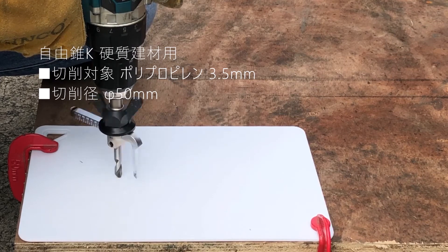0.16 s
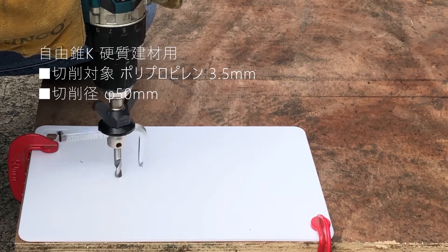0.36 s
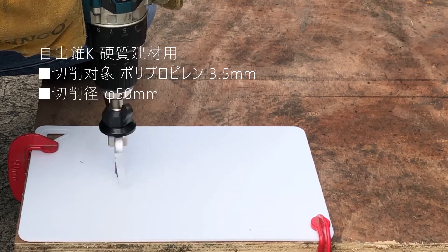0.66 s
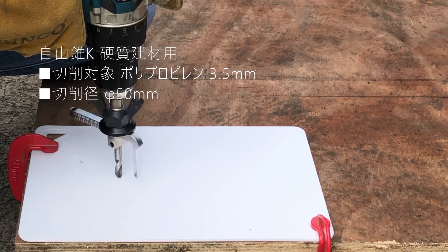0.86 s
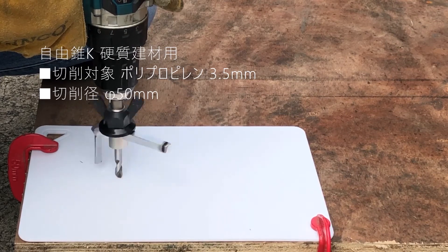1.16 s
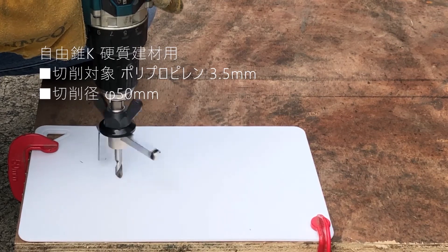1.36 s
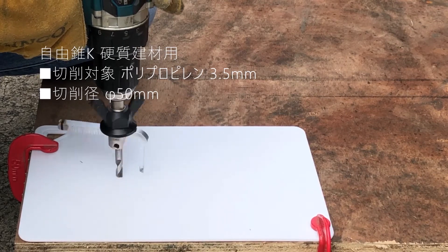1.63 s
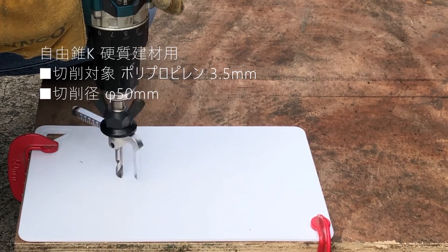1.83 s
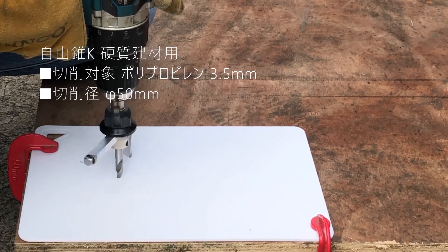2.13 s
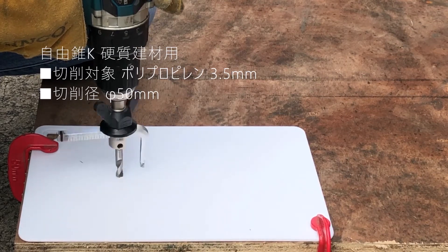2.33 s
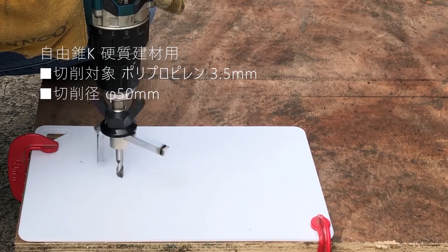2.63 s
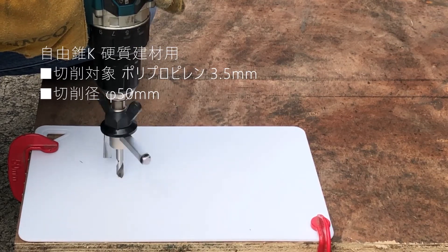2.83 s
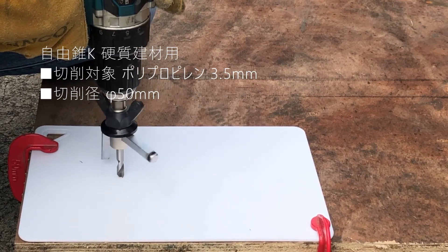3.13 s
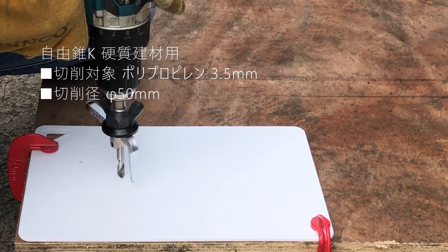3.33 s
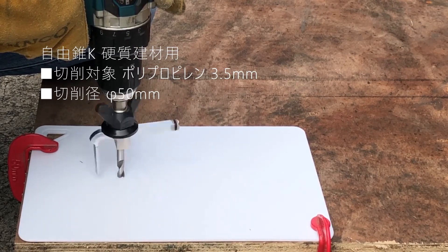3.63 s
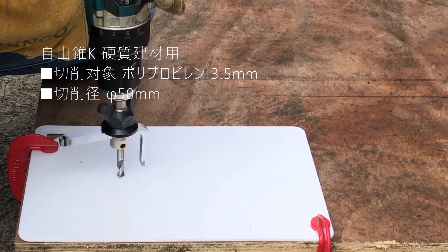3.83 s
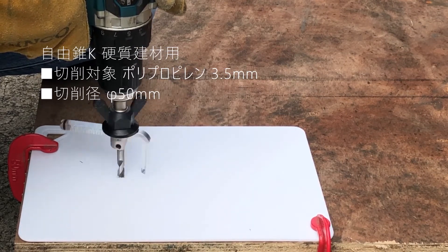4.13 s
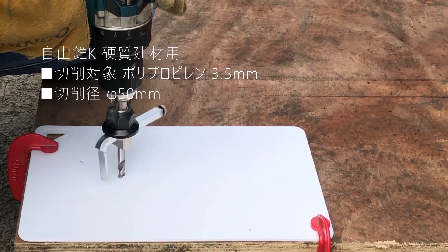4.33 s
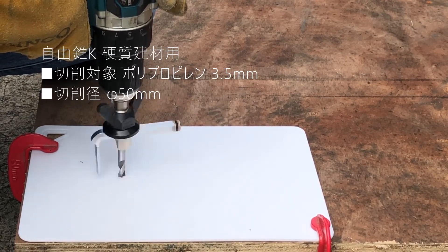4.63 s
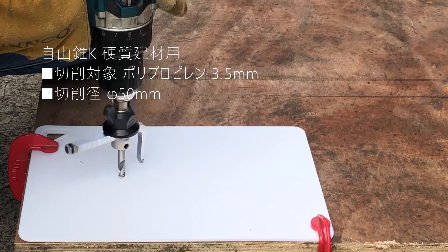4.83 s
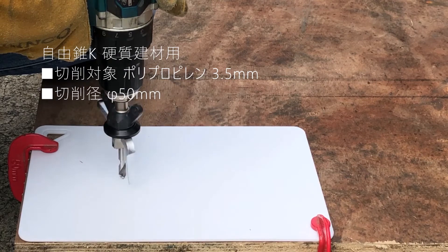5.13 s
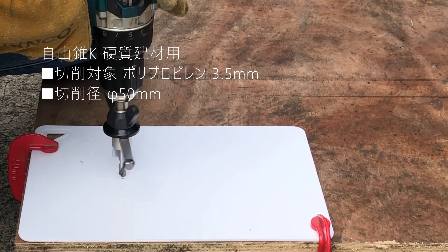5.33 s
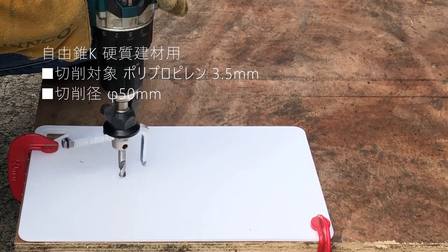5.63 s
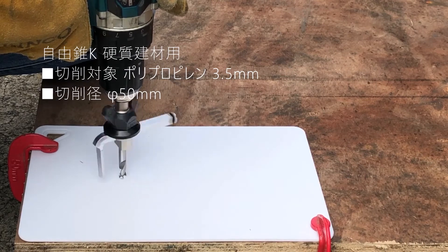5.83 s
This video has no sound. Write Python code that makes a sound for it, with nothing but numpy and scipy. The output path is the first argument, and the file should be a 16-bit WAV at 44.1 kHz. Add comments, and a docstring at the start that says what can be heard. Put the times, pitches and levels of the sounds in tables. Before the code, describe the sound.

A cordless drill is already running at the start, spinning a circle cutter over a plastic sheet. It makes a high whine over a motor hum, with fine gearbox chatter and a hiss of cooling air. Thin, very high tones fade within the first second. At about 1 second the pitch rises and the sound grows, creeping upward until a single sharp tick at about 2.2 seconds, then easing slightly. At 3 seconds the drill jumps quickly to a higher, louder whine with more hiss. It sags and wavers around 4 seconds, climbs back by about 5 seconds and is still running at 6 seconds. Now and then the chatter and hiss dip for an instant. A faint, steady low rumble lies underneath. The sound is mono, from one microphone, with slight short reflections from nearby surfaces.

```python
"""First comes the high whine of a cordless drill, spinning a circle cutter over a clamped plastic sheet.
The trigger is squeezed further in two steps and the motor's speed drives everything: the fan whines at 23
times the shaft rate, the poles hum at 4 times, the gearbox chatters and cooling air hisses, all growing
with speed. Surfaces near the single microphone add short echoes, a low rumble fills the place, and now
and then the level dips briefly."""
import sys
import numpy as np
from scipy.fft import rfft, irfft, next_fast_len
from scipy.io import wavfile
from scipy.ndimage import map_coordinates

SR = 44100
rng = np.random.default_rng(int(sys.argv[2]) if len(sys.argv) > 2 else 0)


def file_out(sig):
    """Save sig as 16-bit WAV at sys.argv[1]."""
    # one column per channel
    cols = np.atleast_2d(sig).T
    # limit, then scale
    lim = np.clip(cols, -1, 1)
    pcm = np.round(lim * 32767).astype(np.int16)
    wavfile.write(sys.argv[1], SR, pcm)


N = 263718
TIME_S = np.arange(N) / SR
CRUISE_HZ = 350  # shaft speed at which growth() adds nothing


def amp(db):
    """Decibels to gain."""
    return 10 ** (np.asarray(db) / 20)


def unit(x):
    """Scale to rms 1."""
    return x / np.sqrt(np.mean(x ** 2) + 1e-20)


def wobble(rate):
    """A smooth random curve, rate knots a second."""
    return map_coordinates(rng.standard_normal(int(N * rate / SR) + 4), [TIME_S * rate])


def filtered(x, response):
    """Pass x through a complex response of frequency."""
    size = next_fast_len(N + SR // 2)
    return irfft(rfft(x, size) * response(np.fft.rfftfreq(size, 1 / SR)), size)[:N]


def noise(spectrum):
    """Noise of rms 1, coloured by (pitch_hz, gain_db) points on a log axis."""
    hz, db = np.transpose(spectrum)
    colour = lambda f: amp(np.interp(np.log(f + 1), np.log(hz), db))
    return unit(filtered(rng.standard_normal(N), colour))


def tone(turns, db):
    """A sine of the given rms level, starting at a random phase."""
    return np.sqrt(2) * amp(db) * np.sin(2 * np.pi * (turns + rng.random()))


def resonate(force, modes):
    """A force rings damped modes (pitch_hz, width_hz, gain_db) of alternating sign."""
    def response(f):
        return sum((-1) ** k * amp(db) * 1j * f * width / (hz * hz - f * f + 1j * f * width)
                   for k, (hz, width, db) in enumerate(modes))
    return filtered(force, response)


def growth(speed, db_per_octave):
    """Level gained over cruising speed, in dB."""
    return db_per_octave * np.log2(speed / CRUISE_HZ)


# The motor shaft as the trigger goes in: time_s, speed_hz
SHAFT_SPEED = [(0.0, 273.4), (0.54, 270.4), (0.6, 263.5), (0.82, 265.5), (1.11, 319.7), (1.35, 332.0),
               (1.61, 332.4), (1.86, 344.8), (2.03, 362.8), (2.29, 370.6), (2.59, 341.7), (2.9, 336.7),
               (2.98, 347.6), (3.02, 392.7), (3.05, 402), (3.11, 474), (3.25, 474), (3.3, 484.6),
               (3.45, 478.6), (3.54, 493.2), (3.71, 492.2), (3.85, 459.5), (4.32, 422), (4.39, 435.5),
               (4.44, 428.8), (4.65, 453), (4.84, 461.5), (4.91, 444.4), (4.98, 476), (5.2, 499.1),
               (5.46, 469.8), (5.78, 466), (5.98, 493)]


def shaft_speed(hunt_s=4.078, hunt_half_s=0.16, hunt_hz=9.1, hunt_depth=0.012):
    """Turns per second, set by trigger and load; the motor hunts up and down as it sags at full trigger."""
    speed = np.interp(TIME_S, *np.transpose(SHAFT_SPEED))
    age = TIME_S - hunt_s
    hunt = hunt_depth * np.cos(2 * np.pi * hunt_hz * age) * np.exp(-(age / hunt_half_s) ** 2)
    jitter = .0007 * wobble(60)
    drift = .0013 * (CRUISE_HZ / speed) ** 3 * wobble(18)  # a slow motor drifts more
    return speed * (1 + hunt + jitter + drift)


# Where reflections cancel the whine at the microphone: pitch_hz, half_width_hz, depth_db
WHINE_NULLS = [(6114, 63, -12), (6750, 200, -9), (7354, 180, -13), (8205, 152, -12.5), (9700, 118, -11.5),
               (10333, 400, -3), (11353, 245, -8.5)]


def fan_whine(speed, turns, blades=23, cruise_db=-31.5, flutter_db=1.2, waver_db=0.3):
    """The blade tone grows with speed and sinks wherever its pitch crosses a null."""
    null_db = sum(db * np.exp(-((blades * speed - hz) / width) ** 2) for hz, width, db in WHINE_NULLS)
    level_db = cruise_db + growth(speed, db_per_octave=16.5) + null_db
    return tone(blades * turns, level_db + flutter_db * wobble(70) + waver_db * wobble(20))


# How loudly the motor's shell gives off a pole tone, before growth with speed: pitch_hz, level_db
MOTOR_SHELL = [(1040, -37.5), (1090, -34), (1160, -35), (1210, -46), (1720, -49.5), (1820, -61),
               (1980, -50.5), (2140, -45), (2180, -56), (2320, -46), (2750, -62), (3190, -52),
               (3270, -40.5), (3400, -64), (3700, -52), (6000, -72)]


def pole_hum(speed, turns, poles=4, flutter_db=1.97):
    """The poles' tone and two overtones swell and fade as they slide over the shell's resonances."""
    hz, db = np.transpose(MOTOR_SHELL)
    shell_db = lambda k: np.interp(np.log(k * speed), np.log(hz), db)
    growth_db = growth(speed, db_per_octave=16.5)
    return sum(tone(k * turns, shell_db(k) + growth_db + flutter_db * wobble(40))
               for k in (poles, 2 * poles, 3 * poles))


# The shaft at slow, middle and full trigger: speed_hz
TRIGGER_SPEEDS = [272, 345, 470]
# Faint tones behind the whine: cycles_per_turn
SHAFT_MULTIPLES = [1, 2, 16, 22, 46]
# Their levels at the microphone, one row a tone: slow_db, middle_db, full_db
SHAFT_TONE_LEVELS = [(-59.5, -60.5, -56.5), (-81, -63, -56), (-48, -47, -65), (-62, -66, -62),
                     (-58, -50, -62)]


def shaft_tones(speed, turns, waver_db=2):
    """Weak tones locked to the shaft, their balance shifting with its speed."""
    return sum(tone(k * turns, np.interp(speed, TRIGGER_SPEEDS, db) + waver_db * wobble(25))
               for k, db in zip(SHAFT_MULTIPLES, SHAFT_TONE_LEVELS))


# Thin, steady high tones at the start: pitch_hz, level_db
THIN_HIGH_TONES = [(6794, -61), (7887, -70), (12522, -69), (14686, -51)]


def opening_tones(hold_s=0.45, fade_s=0.45, waver_db=1.5):
    """Thin high tones hold their pitch and fade within the first second."""
    fade = np.clip(1 - (TIME_S - hold_s) / fade_s, 0, 1)
    return fade * sum(tone(hz * TIME_S, db + waver_db * wobble(23)) for hz, db in THIN_HIGH_TONES)


# Resonances of the gearbox housing: pitch_hz, width_hz, gain_db
HOUSING_MODES = [(950, 200, -10.5), (1362, 190, -11.5), (2065, 450, -11.5), (3140, 73, -9),
                 (3550, 310, -11.5), (4320, 430, -5), (4650, 248, -1), (5106, 123, 2.5), (5560, 193, -1.5),
                 (6230, 660, -6.5), (6960, 480, -8.5), (8100, 850, -12)]


def gearbox(turns, level_db, teeth=9, scatter_db=3.5, planet_db=0.5, rattle_db=0.7):
    """Teeth strike, each with its own force, and slide in between; both ring the housing."""
    strikes = np.flatnonzero(np.diff(np.floor(teeth * turns)))
    force = np.zeros(N)
    force[strikes] = rng.standard_normal(len(strikes))
    force[strikes] *= amp(scatter_db * rng.standard_normal(len(strikes)))
    sliding = rng.standard_normal(N)
    chatter = unit(resonate(unit(force) + sliding, HOUSING_MODES))
    planet_turns = .64 * turns  # the load swells once for each turn of a planet gear
    load_db = planet_db * np.sin(2 * np.pi * planet_turns) + rattle_db * wobble(60)
    return chatter * amp(level_db + load_db)


# Colour of the air leaving the vents: pitch_hz, gain_db
AIR_SPECTRUM = [(100, -19), (400, -5.5), (650, -10.5), (950, -5), (1600, -2), (2500, -7), (3000, 0),
                (4000, -0.5), (7500, 0.5), (11500, 3.5), (13200, 1.5), (14600, 0), (15150, -4),
                (15500, 4.5)]


def cooling_air(speed, cruise_db=-34, flutter_db=0.5):
    """A broad hiss from the motor's vents, rising steeply in level with speed."""
    level_db = cruise_db + growth(speed, db_per_octave=19)
    return noise(AIR_SPECTRUM) * amp(level_db + flutter_db * wobble(120))


def near_echo(x, near_s=.00142, near_gain=0.13, later_gain=.05):
    """A hard surface adds a path half a metre longer to the microphone; weaker reflections follow."""
    later_s = rng.uniform(.003, .02, 8)
    echo = lambda f, s: np.exp(-2j * np.pi * f * s)
    later = lambda f: sum(echo(f, s) for s in later_s)
    return filtered(x, lambda f: 1 + near_gain * echo(f, near_s) + later_gain * later(f))


# Colour of the ambience around the work: pitch_hz, gain_db
RUMBLE_SPECTRUM = [(15, -40), (26, -25), (33, -7), (42, -9), (50, -4), (60, 2), (85, -4), (110, 0),
                   (160, -5), (280, -7), (380, -13), (650, -18), (1500, -21.5), (8000, -86)]


def background(rumble_db=-42, mains_hz=59, mains_db=-59):
    """The place itself: a steady low rumble with a faint mains drone."""
    rumble = noise(RUMBLE_SPECTRUM) * amp(rumble_db + 0.12 * wobble(9))
    return rumble + tone(mains_hz * TIME_S, mains_db + 3 * wobble(2.4))


# Brief dips in the chatter and hiss: middle_s, half_width_s, depth_db
LEVEL_DIPS = [(.105, .011, -14), (.215, .011, -13), (.361, .01, -16), (.96, .014, -12), (1.472, .008, -17),
              (1.909, .014, -40), (2.111, .006, -20), (2.517, .008, -18), (3.54, .01, -12),
              (3.68, .015, -36), (5.048, .015, -40), (5.333, .008, -15)]


def dips():
    """Gain in dB: the level sinks for a few hundredths of a second and returns."""
    return sum(db * np.exp(-np.abs((TIME_S - s) / width) ** 3) for s, width, db in LEVEL_DIPS)


# Thin, narrow tones that linger while the level dips: pitch_hz, width_hz, gain_db
DIP_TONES = [(4220, 12, 2), (5080, 4.7, 8.5), (5090, 30, 10.5), (5605, 26, 7), (6420, 84, 3)]


def dip_tones(level_db):
    """Each thin tone is noise passed twice through a narrow band."""
    tones = np.zeros(N)
    for hz, width, db in DIP_TONES:
        band = [(hz, width, db)]
        narrow = resonate(resonate(rng.standard_normal(N), band), band)
        tones += amp(db) * unit(narrow)
    return unit(tones) * amp(level_db)


# A sharp tick from the spinning tool, before the echoes: start_s, peak_db
TOOL_TICKS = [(2.248, -14.5)]


def ticks(decay_s=0.00053):
    """A short crack rings the housing."""
    out = np.zeros(N)
    for start_s, peak_db in TOOL_TICKS:
        age = TIME_S - start_s
        burst = rng.standard_normal(N) * (age >= 0) * np.exp(-np.abs(age) / decay_s)
        crack = resonate(burst, HOUSING_MODES)
        out += amp(peak_db) * crack / np.abs(crack).max()
    return out


def scene(gear_cruise_db=-32, load_db=0.19):
    """The drill and its surroundings at one microphone, the same in both channels."""
    speed = shaft_speed()
    turns = np.cumsum(speed) / SR
    gear_db = gear_cruise_db + growth(speed, db_per_octave=6.5) + load_db * wobble(10)
    rush = near_echo(gearbox(turns, gear_db) + cooling_air(speed) + ticks())
    # in a dip the rush gives way to thin tones; hum and rumble sink less, and the whine carries through
    dip_db = dips()
    mono = rush * amp(dip_db) + dip_tones(gear_db - 1) * (1 - amp(dip_db))
    mono += shaft_tones(speed, turns) * amp(dip_db)
    mono += fan_whine(speed, turns)
    mono += pole_hum(speed, turns) * amp(0.34 * dip_db)
    mono += opening_tones()
    mono += background() * amp(0.79 * dip_db)
    return np.array([mono, mono])


def record(dry, top_hz=15750):
    """The recorder keeps nothing above its band limit."""
    return np.array([filtered(channel, lambda f: f < top_hz) for channel in dry])


dry = scene()
out = record(dry)
file_out(out)
```